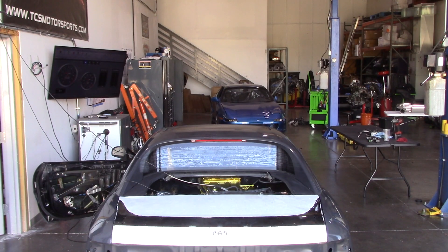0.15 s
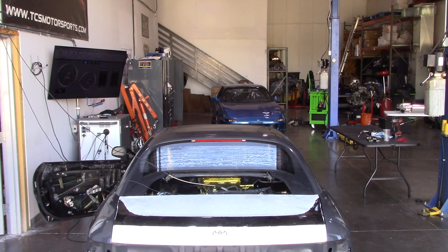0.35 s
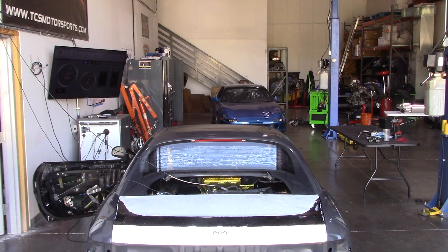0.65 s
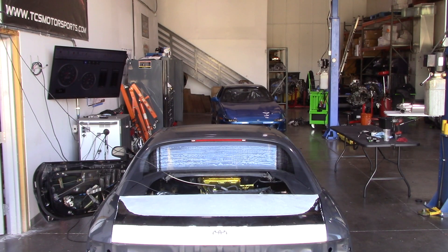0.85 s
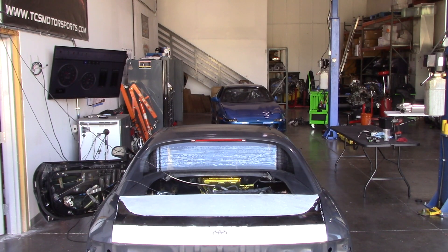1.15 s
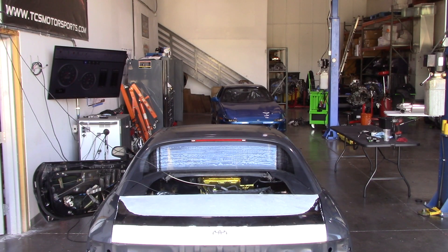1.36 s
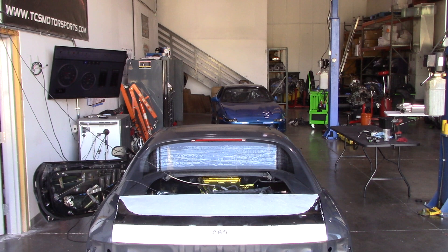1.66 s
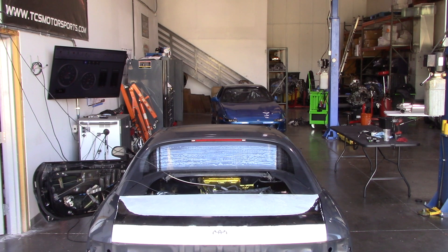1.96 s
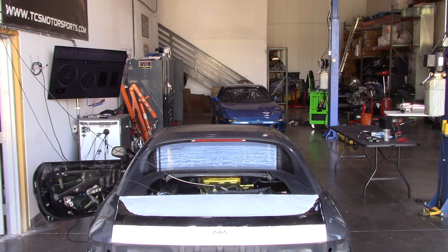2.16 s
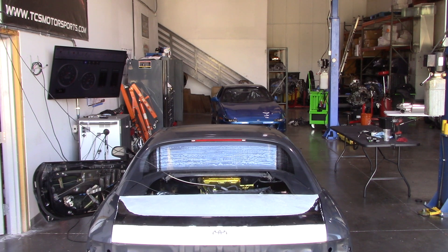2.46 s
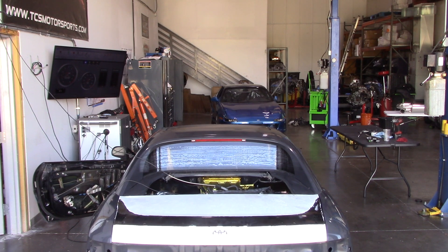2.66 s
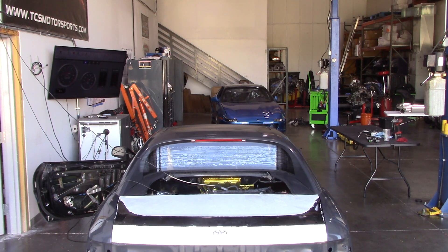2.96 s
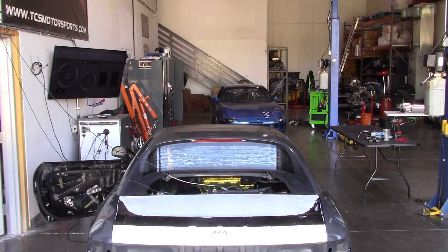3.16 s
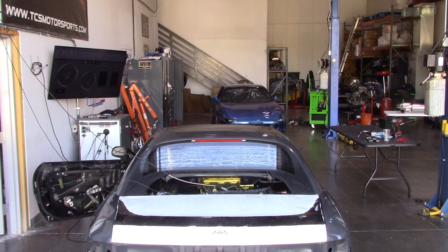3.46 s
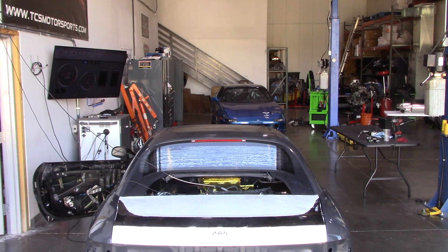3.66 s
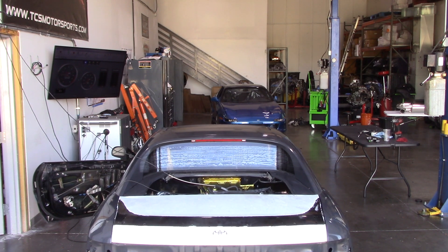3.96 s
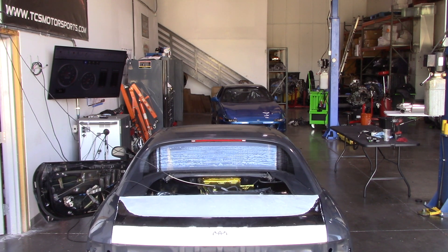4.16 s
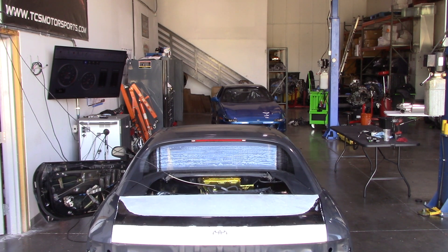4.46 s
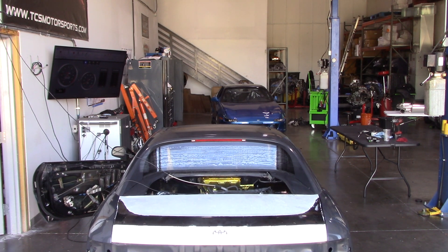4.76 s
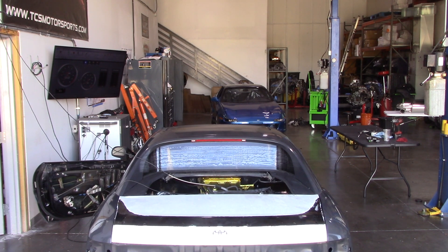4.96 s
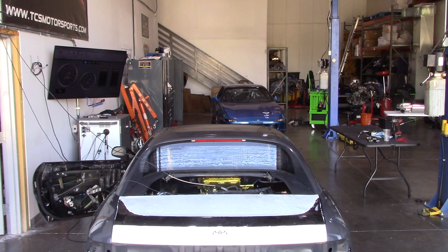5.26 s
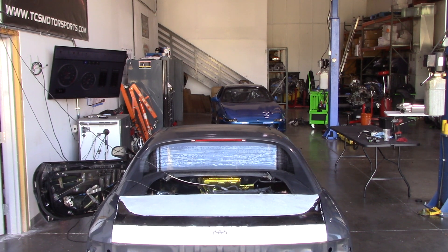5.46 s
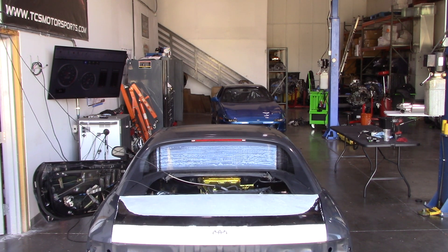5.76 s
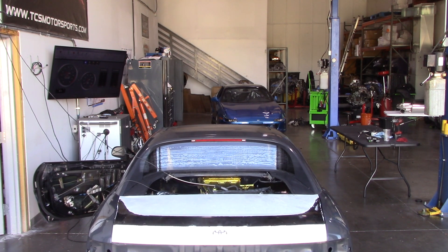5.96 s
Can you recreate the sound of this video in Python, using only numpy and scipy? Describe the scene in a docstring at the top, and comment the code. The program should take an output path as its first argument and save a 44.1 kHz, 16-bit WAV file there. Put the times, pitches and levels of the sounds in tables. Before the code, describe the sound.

A car engine booms and rasps on workshop rollers, rising to high revs, falling back and revving up quickly again.

```python
"""Four-cylinder car on a chassis dynamometer.

Heard from behind in a workshop, it revs gently, drops, climbs high, falls to idle and is blipped up.
Crank orders sweep through exhaust and room resonances, booming near 60 Hz. Jet rasp and air hiss grow
with speed, gas puffs burble in the pipe as the throttle moves, rollers whirr and thin whistles flit by."""
import sys
import numpy as np
from scipy import signal
from scipy.fft import rfft, irfft, next_fast_len
from scipy.io import wavfile
from scipy.ndimage import map_coordinates

SR = 44100
rng = np.random.default_rng(int(sys.argv[2]) if len(sys.argv) > 2 else 0)


def persist_wave(psi):
    """Save psi, clipped to +-1, as 16-bit WAV."""
    counts = np.round(np.clip(psi, -1, 1) * 32767).astype(np.int16)
    wavfile.write(sys.argv[1], SR, np.atleast_2d(counts).T)


N = 269451

# Cylinder inequality. Each row: time in seconds, level in dB.
IMBALANCE = [(0, -15), (.5, -1), (.85, 3.5), (1.8, -10.5), (2.1, -4.5), (2.55, 4.5), (2.8, -1.5),
             (3.5, -18), (4.0, -6.5), (5.1, -5), (5.6, -6.5), (5.8, -26), (6.11, -3.5)]
# Exhaust cavity modes. Each row: centre in Hz, width in Hz, gain in dB.
CAVITY_MODES = [(155, 195, -2), (228.4, 88, 3), (330, 52, -0.5), (476, 77, -0.5), (584.4, 86, 0),
                (850, 22, -31)]
# Exhaust jet level: dB at cruise, dB per octave of speed, dB per dB of effort.
JET_LAW = (-45, 9.1, 0.056)


def amp(db):
    """Decibels to gain."""
    return 10 ** (np.asarray(db) / 20)


def unit(x):
    """x at rms 1."""
    return x / np.sqrt(np.mean(x ** 2) + 1e-20)


def at_hz(points, hz):
    """(Hz, value) points read on a log axis."""
    knots_hz, values = np.transpose(points)
    return np.interp(np.log(hz + 1e-6), np.log(knots_hz), values)


def curve(points):
    """(seconds, value) points read at every sample."""
    knots_s, values = np.transpose(points)
    return np.interp(np.arange(N) / SR, knots_s, values)


def wobble(rate_hz):
    """Smooth random curve, rate_hz knots a second."""
    return map_coordinates(rng.standard_normal(N // 20), [np.arange(N) * rate_hz / SR], mode="wrap")


def swell(centre_s, sigma_s, peak_db):
    """Gain of a bell-shaped rush."""
    return amp(peak_db) * np.exp(-0.5 * ((np.arange(N) / SR - centre_s) / sigma_s) ** 2)


def filtered(x, response):
    """x through a frequency response."""
    size = next_fast_len(N + SR // 2)
    return irfft(rfft(x, size) * response(np.fft.rfftfreq(size, 1 / SR)), size)[:N]


def coloured(x, spectrum):
    """x through a (Hz, dB) spectrum, at rms 1."""
    return unit(filtered(x, lambda hz: amp(at_hz(spectrum, hz))))


def puffs(angle, depth):
    """White noise that swells once per firing."""
    return rng.standard_normal(N) * (1 + depth * np.cos(angle))


def tone(angle, rough, flutter_hz):
    """One engine order; unequal cycles shake its size and phase."""
    in_phase = (1 + rough * wobble(flutter_hz)) * np.sin(angle)
    quadrature = rough * wobble(flutter_hz) * np.cos(angle)
    return np.sqrt(2) * (in_phase + quadrature)


def engine_gain(law, firing_hz, cruise_hz=110):
    """Gain from a law: dB at cruise, dB per octave of speed, dB per dB of effort."""
    # Firing sharpness. Each row: time in seconds, effort in dB (0 = light throttle).
    effort = [(0, -3.5), (.25, 0), (.9, -5), (1.17, -7.5), (1.45, 5), (1.72, -1.5), (1.84, 10),
              (1.96, -1.5), (2.2, 2.5), (2.85, -3.5), (3.0, 4), (3.2, 5.5), (3.4, 3), (3.55, 10.5),
              (3.98, -8.5), (4.19, -0.5), (4.4, -2), (5.08, 0.5), (5.22, 13.5), (5.42, -18), (5.58, -7.5),
              (5.75, -0.5), (6.11, 1)]
    cruise_db, db_per_octave, db_per_effort = law
    return amp(cruise_db + db_per_octave * np.log2(firing_hz / cruise_hz) + db_per_effort * curve(effort))


def workshop(x):
    """Diffuse reverberation, dying faster in the treble."""
    # Each row: frequency in Hz, T60 in seconds.
    decay = [(100, 1), (600, 0.64), (4000, 0.21), (12000, 0.086)]
    hz, t, noise = signal.stft(rng.standard_normal(SR // 2), SR, nperseg=256)
    tail = signal.istft(noise * amp(-60 * t / at_hz(decay, hz)[:, None]), SR, nperseg=256)[1]
    return signal.fftconvolve(x, np.pad(tail, (400, 0)) / np.linalg.norm(tail))[:N]


def panels(x):
    """Sheet metal resonances lift narrow bands; output at rms 1."""
    # Each row: centre in Hz, width in Hz, lift in dB.
    modes = [(856, 53, 9.5), (936, 67, 5), (1013, 28, 8.5), (1070, 13, 3.5), (1234, 14, -0.5),
             (1336, 38, 3.5), (1520, 32, 3.5), (1620, 32, 5), (2088, 12, 6.5), (2520, 41, 3.5),
             (2656, 60, 3), (4050, 150, 2), (6570, 58, 4), (8260, 130, 3)]

    def lift_db(hz):
        return sum(db * np.exp2(-(2 * (hz - centre) / width) ** 2) for centre, width, db in modes)
    return unit(filtered(x, lambda hz: amp(lift_db(hz))))


def tick(t60_s):
    """A light, bright contact of metal."""
    # Start in seconds, level in dB.
    contact = (4.638, -54)
    start_s, db = contact
    age_s = np.arange(N) / SR - start_s
    spectrum_hz_db = [(1500, -24), (3500, -8), (7000, 7), (12000, -8), (14000, -13), (15500, -15)]
    burst = coloured(rng.standard_normal(N), spectrum_hz_db)
    return amp(db - 60 * np.abs(age_s) / t60_s) * (age_s > 0) * burst


def whistles(waver_hz=220):
    """Brief wavering treble whistles, level or falling in pitch."""
    # Each row: start in seconds, length in seconds, start in Hz, end in Hz, peak in dB.
    glides = [(3.628, 0.156, 8310, 8310, -50), (3.792, .09, 14180, 13500, -47),
              (5.075, 0.08, 16000, 14000, -53)]
    t, out = np.arange(N) / SR, np.zeros(N)
    for start_s, length_s, start_hz, end_hz, db in glides:
        progress = np.clip((t - start_s) / length_s, 0, 1)
        hz = start_hz + (end_hz - start_hz) * progress + waver_hz * wobble(1100)
        out += amp(db) * np.sin(np.pi * progress) * np.sin(2 * np.pi * np.cumsum(hz) / SR)
    return out


def driveline(angle, firing_hz, onset_hz=115, full_hz=160):
    """Gears and rollers whine between the engine orders, at high speed only."""
    # Each row: multiple of the firing rate, level in dB re the jet.
    orders = [(.675, -1), (2.85, 0.5), (6.75, -7)]
    fast = np.interp(firing_hz, [onset_hz, full_hz], [0, 1])
    whine = sum(amp(db) * tone(multiple * angle, rough=0.15, flutter_hz=14) for multiple, db in orders)
    return fast * engine_gain(JET_LAW, firing_hz) * whine


def buffet(firing_hz, onset_hz=130, full_hz=146.7):
    """The exhaust stream rumbles, more at high speed, and chuffs as the throttle moves."""
    # Each row: frequency in Hz, density in dB.
    spectrum = [(12, -29), (24, -11), (33, -7.5), (42, 1.5), (55, -3.5), (70, -3.5), (84, -26.5),
                (160, -22.5), (300, -40), (600, -90.5)]
    # Each row: centre in seconds, sigma in seconds, peak in dB.
    chuffs = [(1.15, 0.21, -27.5), (4.51, 0.077, -21.5), (5.35, 0.15, -32)]
    stream_db = np.interp(firing_hz, [onset_hz, full_hz], [-32.5, -22.5])
    gain = np.hypot(amp(stream_db), sum(swell(*row) for row in chuffs))
    return gain * coloured(rng.standard_normal(N), spectrum)


def snarl(angle):
    """High, rough overtones of the firing pulses, at rms 1."""
    return unit(sum(tone(k * angle, rough=0.3, flutter_hz=40) / k ** 0.6 for k in range(5, 17)))


def flow(angle, firing_hz, snarl_db=-17, vent_rasp_db=0.5, tyre_hiss_db=-15):
    """Rasp and hiss from engine flow, spinning rollers and air vented as the throttle shuts."""
    # Both spectra, each row: frequency in Hz, density in dB.
    rasp_spectrum = [(380, -18.5), (650, 0), (783, -2.5), (851, -8), (1040, -4), (1140, -0.5), (2370, -5.5),
                     (2650, -9.5), (6000, -23.5), (7800, -46.5), (13200, -120)]
    hiss_spectrum = [(1470, -40), (2500, -16), (2660, -2), (2910, -3), (4080, -6), (4410, -6), (5140, -6),
                     (5900, -8.5), (6420, -8), (9640, -15), (13100, -17.5), (15600, -21.5)]
    # Air hiss: dB at cruise, dB per octave of speed, dB per dB of effort.
    air_law = (-50.5, 9.7, 0.021)
    # Each row: time in seconds, level in dB.
    roller_whirr = [(0, -68), (.8, -52), (1.25, -59), (2.0, -49), (2.7, -42), (3.7, -41.5), (4.6, -44.5),
                    (5.1, -44), (5.3, -40), (6.11, -41)]
    # Centre in seconds, sigma in seconds, peak in dB.
    blow_off = (3.7, 0.07, -41.5)
    vent, rollers = swell(*blow_off), amp(curve(roller_whirr))
    jet_gain, air_gain = engine_gain(JET_LAW, firing_hz), engine_gain(air_law, firing_hz)
    rasp_gain = np.linalg.norm([jet_gain, rollers, amp(vent_rasp_db) * vent], axis=0)
    hiss_gain = np.linalg.norm([air_gain, amp(tyre_hiss_db) * rollers, vent], axis=0)
    jet = coloured(puffs(angle, depth=0.067), rasp_spectrum) + amp(snarl_db) * snarl(angle)
    rasp = rasp_gain * amp(0.65 * wobble(24.77)) * panels(jet)
    hiss_flicker = amp(0.67 * wobble(30))
    air = coloured(puffs(angle, depth=0.041), hiss_spectrum)
    return rasp + hiss_gain * hiss_flicker * panels(air)


def turbulence(angle, firing_hz, muffler_hz=1100):
    """Gas puffs ring the exhaust cavities and burble as the throttle moves."""
    # In-pipe turbulence: dB at cruise, dB per octave of speed, dB per dB of effort.
    churn_law = (-43, 4.8, 0.17)
    # Each row: centre in seconds, sigma in seconds, peak in dB.
    burbles = [(1.0, 0.048, -44), (1.86, 0.072, -39), (2.56, .12, -39.5), (3.72, 0.1, -38),
               (5.3, 0.052, -35), (5.55, 0.21, -37.5)]

    def response(hz):
        ring = sum((-1) ** k * amp(db) * 1j * hz * width / (centre ** 2 - hz ** 2 + 1j * hz * width)
                   for k, (centre, width, db) in enumerate(CAVITY_MODES))
        return ring / (1 + (hz / muffler_hz) ** 4)
    gain = np.hypot(engine_gain(churn_law, firing_hz), sum(swell(*row) for row in burbles))
    return gain * unit(filtered(puffs(angle, depth=0.58), response))


def pops(t60_s, attack_s=0.0024):
    """Hard firings ring three exhaust cavities as the throttle snaps open."""
    # Each row: start in seconds, level in dB.
    firings = [(5.168, -45), (5.226, -20), (5.286, -22.5)]
    out = np.zeros(N)
    for start_s, db in firings:
        age_s = np.maximum(np.arange(N) / SR - start_s, 0)
        ring = sum(amp(mode_db) * np.sin(2 * np.pi * (hz * age_s + rng.random()))
                   for hz, _, mode_db in CAVITY_MODES[2:5])
        out += amp(db - 60 * age_s / t60_s) * (1 - np.exp(-age_s / attack_s)) * ring
    return out


def exhaust(angle, firing_hz, slope_db_per_octave=-19.0, top_db=-8, shelf_hz=600):
    """Crank orders sweep through the pipe resonances; odd ones come from unequal cylinders."""
    # Each row: frequency in Hz, gain in dB.
    pipe_response = [(90.0, -38), (130.0, -28.5), (160.0, -27.5), (190.0, -23.5), (270.0, -27),
                     (310.0, -15.5), (340.0, -12), (390.0, -15.5), (447.0, 1), (485.0, -2), (535.0, -14.5),
                     (605.0, -5), (680.0, -23), (900.0, -4)]
    # Pulse overtones: dB at cruise, dB per octave of speed, dB per dB of effort.
    bark_law = (-16.5, 0, 0.92)
    odd_db = -4.5 + 1.6 * curve(IMBALANCE)
    out = np.zeros(N)
    for order in [3, *range(5, 17)]:  # orders 1, 2 and 4 are in boom()
        multiple = order / 2
        hz = multiple * firing_hz
        source_db = slope_db_per_octave * np.log2(multiple / 2) + (order % 2) * odd_db
        pipe_db = at_hz(pipe_response, hz) + top_db * np.clip(np.log2(hz / shelf_hz), 0, 1)
        phase = multiple * angle + 2 * np.pi * rng.random()
        out += amp(source_db + pipe_db) * tone(phase, rough=0.091, flutter_hz=35.35)
    return engine_gain(bark_law, firing_hz) * out


def boom(angle, firing_hz, shake_db=-3):
    """Crank rate, firing rate and its octave swell through low room and muffler resonances."""
    # Both responses, each row: frequency in Hz, gain in dB.
    low_response = [(30, -35), (45, -29.5), (50, -18), (54, -15.5), (60, -14), (66, -18), (75, -29),
                    (100, -34), (125, -28.5), (150, -22.5), (172, -31)]
    muffler_response = [(105, -51.5), (150, -28.5), (180, -31), (200, -40.5), (220, -36), (280, -37.5),
                        (315, -32), (338, -28)]
    # Firing pulse, collapsing below idle. Each row: time in seconds, level in dB.
    pulse_weight = [(0, -6), (.9, -12.5), (1.2, -4), (1.42, 6.5), (1.55, 3), (1.9, 3.5), (2.3, -3.5),
                    (3.3, -2), (3.7, 1.5), (4.0, 2.5), (4.3, 0), (4.48, 4), (4.57, -20.5), (4.7, -24.5),
                    (4.9, -4.5), (5.15, 5), (5.3, 8), (5.42, -5.5), (6.11, 3)]
    # Muffler hum: dB at cruise, dB per octave of speed, dB per dB of effort.
    hum_law = (-3.23, 0, 0.44)
    shake_gain = amp(shake_db + curve(IMBALANCE) + at_hz(low_response, firing_hz / 2))
    firing_gain = amp(curve(pulse_weight) + at_hz(low_response, firing_hz))
    hum_gain = engine_gain(hum_law, firing_hz) * amp(at_hz(muffler_response, 2 * firing_hz))
    shake = shake_gain * tone(angle / 2, rough=0.02, flutter_hz=26.57)
    firing = firing_gain * tone(angle, rough=0.025, flutter_hz=31.0)
    hum = hum_gain * tone(2 * angle, rough=0.29, flutter_hz=35.7)
    return shake + firing + hum


def scene():
    """One firing angle, two cycles per crank turn, drives the engine."""
    # Each row: time in seconds, firing rate in Hz.
    speed = [(0.0, 93.4), (0.22, 105.1), (0.54, 111.4), (0.75, 107.7), (0.9, 99.8), (1.0, 89.64),
             (1.14, 75.16), (1.31, 61.62), (1.38, 60.4), (1.44, 64.85), (1.51, 75.9), (1.53, 78.55),
             (1.62, 83.5), (1.79, 86.35), (1.9, 100.1), (1.97, 102.6), (2.09, 105.3), (2.31, 119.2),
             (2.53, 125.2), (2.69, 139), (2.87, 144.2), (2.98, 152.3), (3.38, 171.3), (3.56, 163.3),
             (3.76, 143), (4.29, 81.3), (4.53, 59.7), (4.61, 51.64), (4.7, 51.87), (4.8, 63.7),
             (4.87, 58.75), (4.93, 56.9), (5.07, 51.23), (5.14, 55.4), (5.16, 59.8), (5.19, 76.2),
             (5.22, 93.35), (5.26, 108.8), (5.33, 127.6), (5.43, 146.2), (5.5, 145.2), (5.78, 107.2),
             (5.8, 106.5), (5.94, 119), (6.11, 114.4)]
    firing_hz = curve(speed) * (1 + 0.0029 * wobble(20))
    angle = 2 * np.pi * np.cumsum(firing_hz) / SR
    pipe = exhaust(angle, firing_hz) + turbulence(angle, firing_hz) + pops(t60_s=0.089)
    near = pipe + whistles() + tick(t60_s=0.1)
    diffuse = boom(angle, firing_hz) + flow(angle, firing_hz)
    diffuse += buffet(firing_hz) + driveline(angle, firing_hz)
    return (diffuse + near + amp(-12.5) * workshop(near))[None]


def record(dry):
    """Brick-wall low-pass at 15750 Hz."""
    return filtered(dry[0], lambda hz: hz < 15750)[None]


dry = scene()
out = record(dry)
persist_wave(out)
```